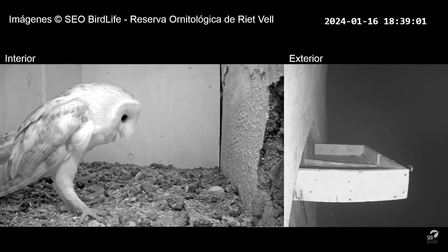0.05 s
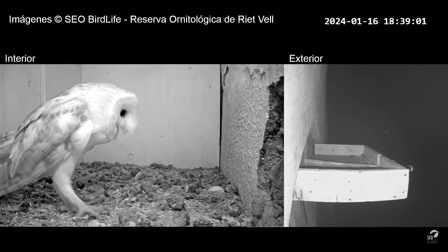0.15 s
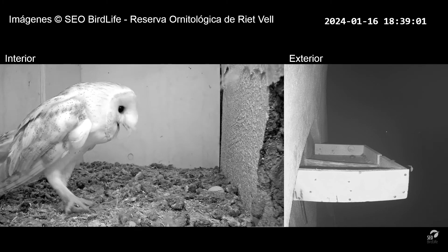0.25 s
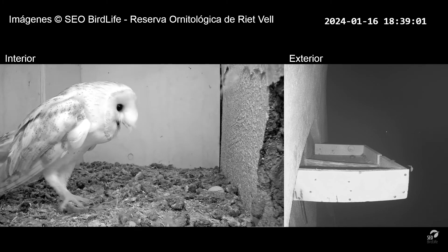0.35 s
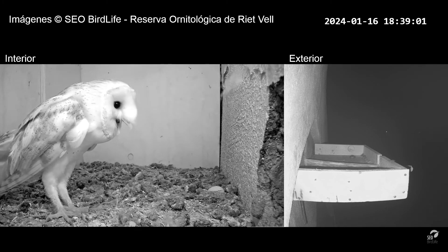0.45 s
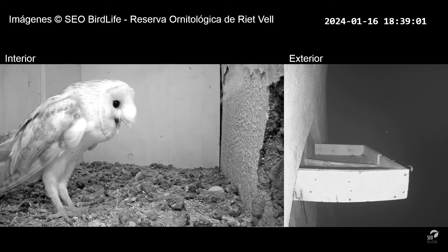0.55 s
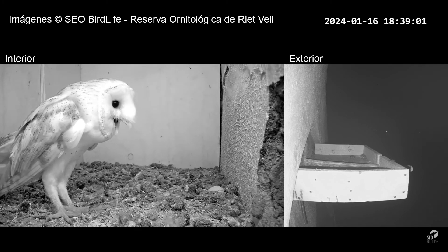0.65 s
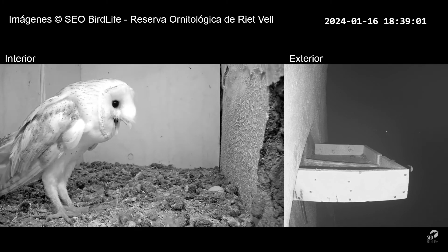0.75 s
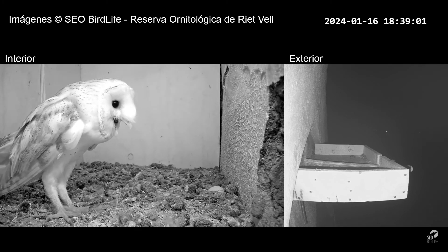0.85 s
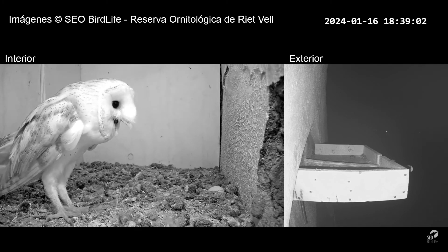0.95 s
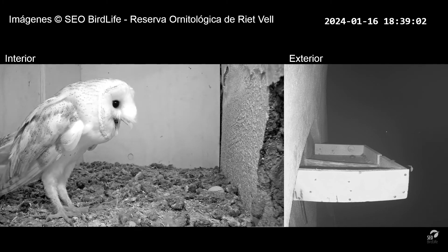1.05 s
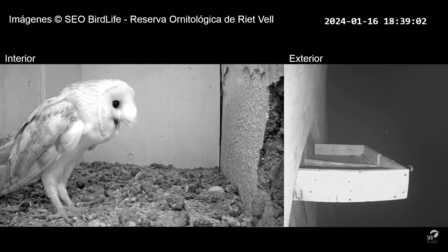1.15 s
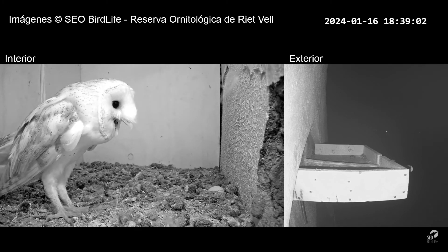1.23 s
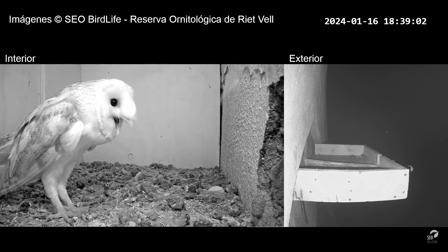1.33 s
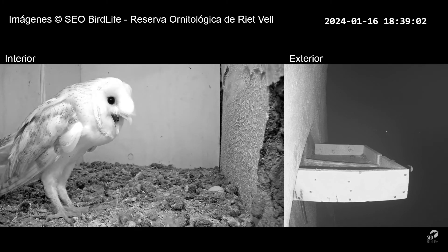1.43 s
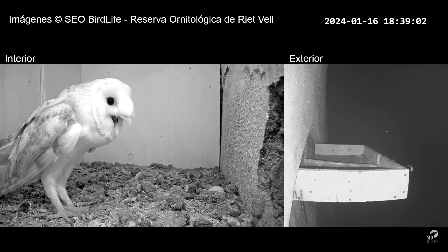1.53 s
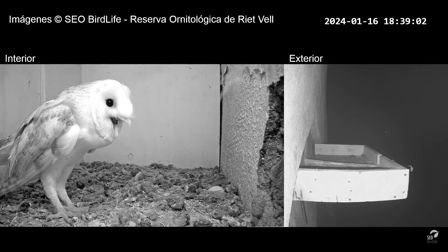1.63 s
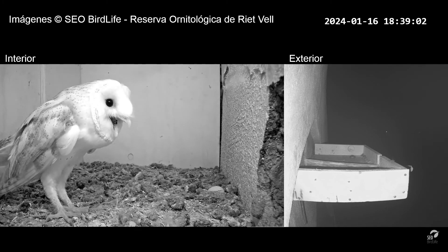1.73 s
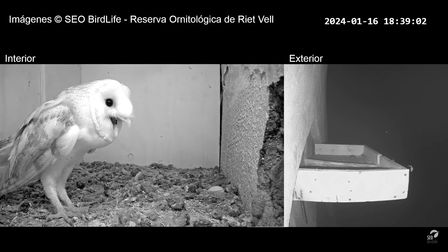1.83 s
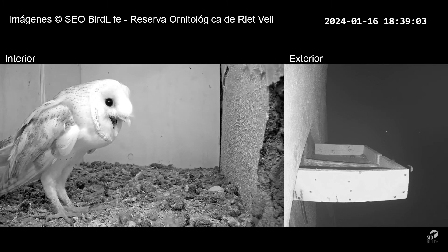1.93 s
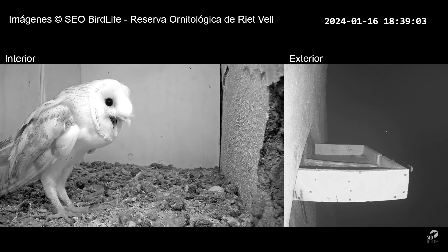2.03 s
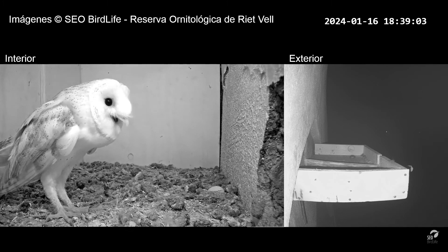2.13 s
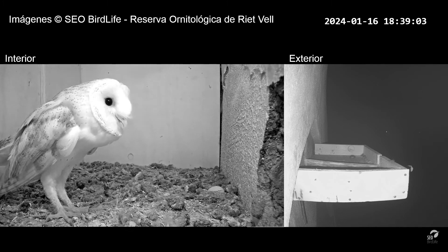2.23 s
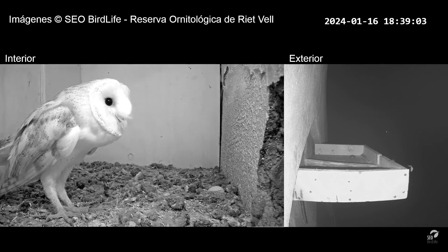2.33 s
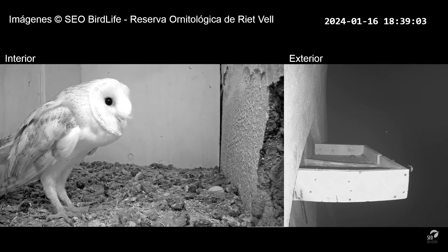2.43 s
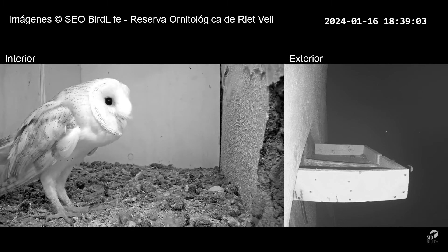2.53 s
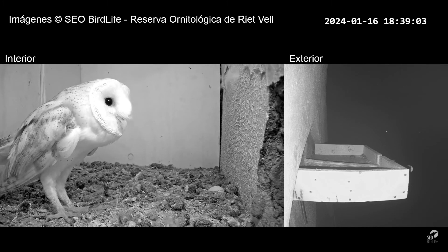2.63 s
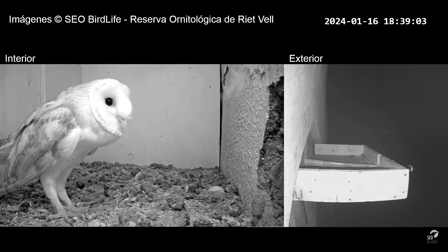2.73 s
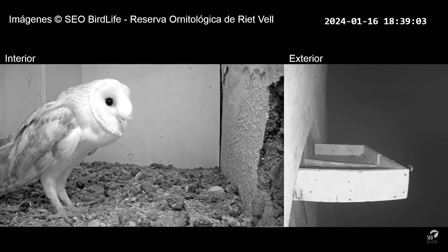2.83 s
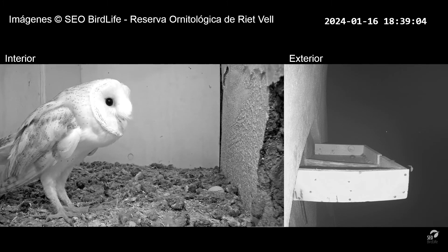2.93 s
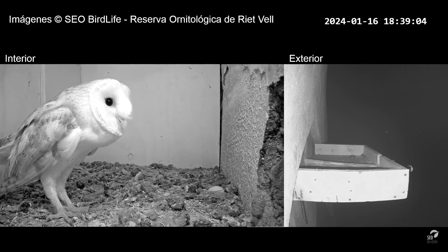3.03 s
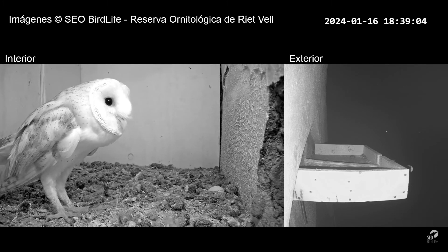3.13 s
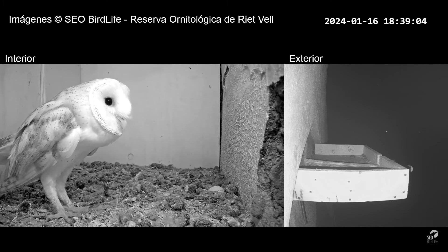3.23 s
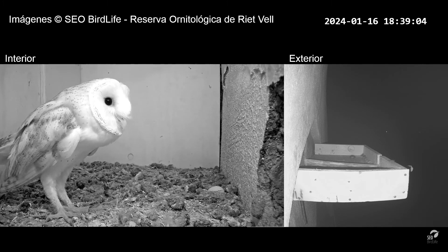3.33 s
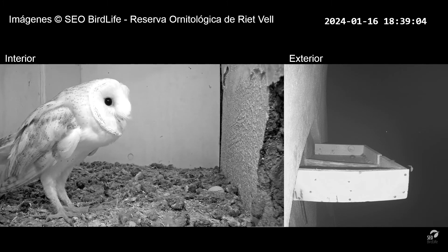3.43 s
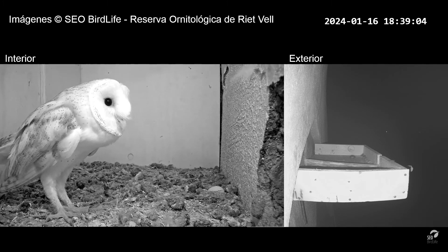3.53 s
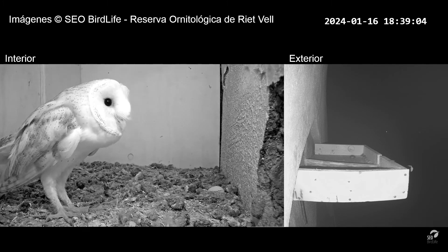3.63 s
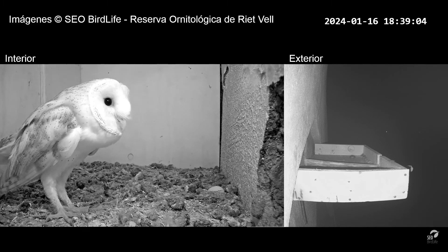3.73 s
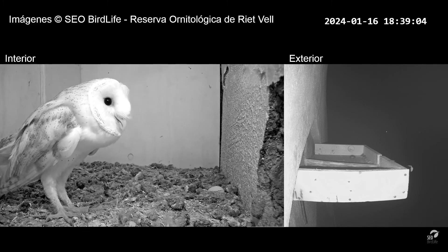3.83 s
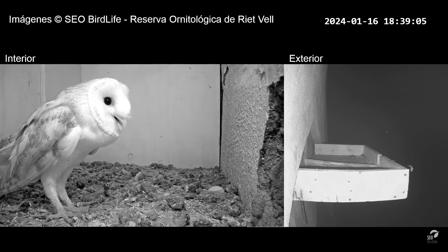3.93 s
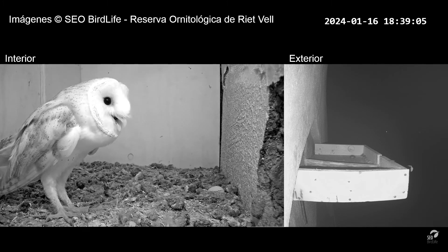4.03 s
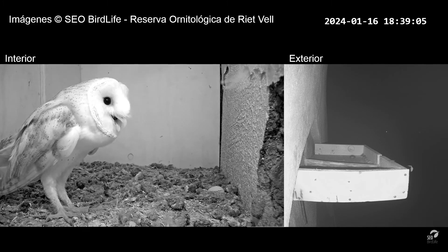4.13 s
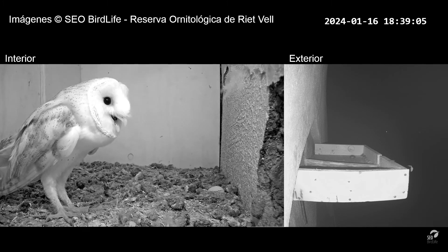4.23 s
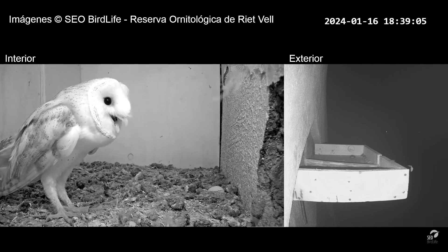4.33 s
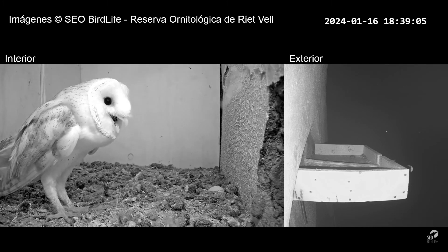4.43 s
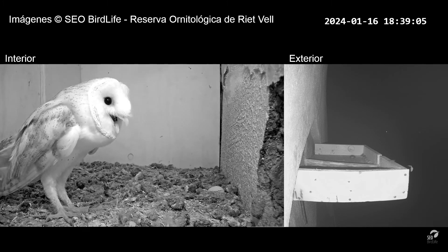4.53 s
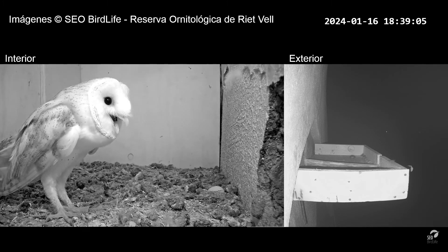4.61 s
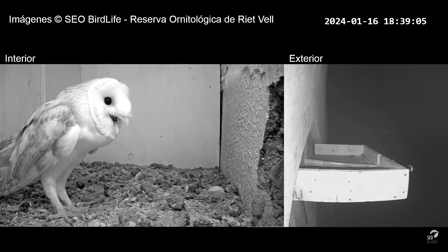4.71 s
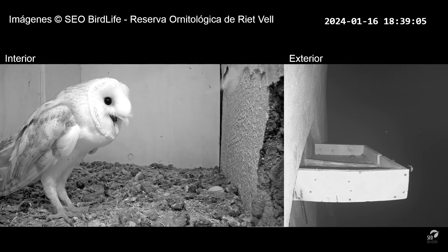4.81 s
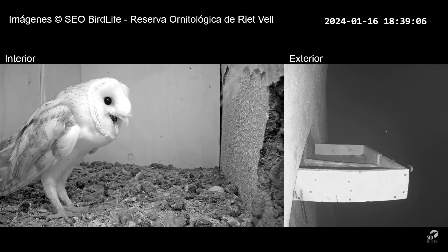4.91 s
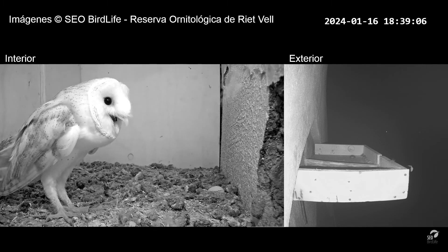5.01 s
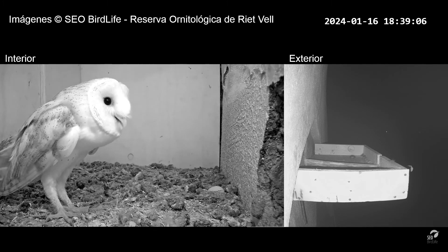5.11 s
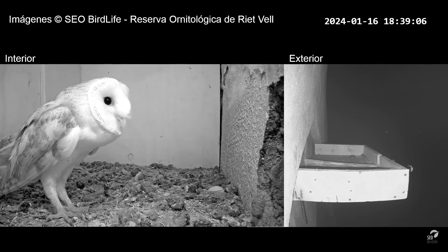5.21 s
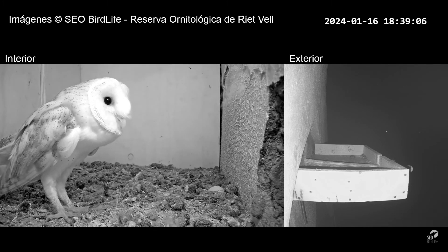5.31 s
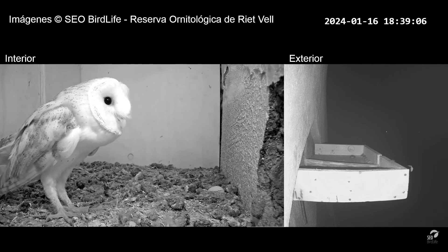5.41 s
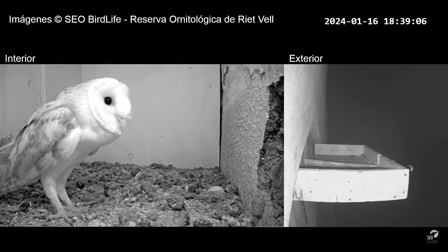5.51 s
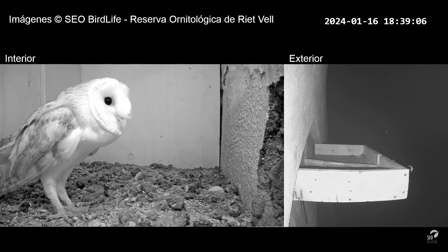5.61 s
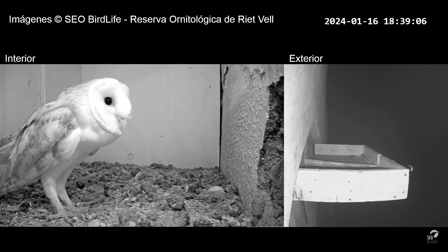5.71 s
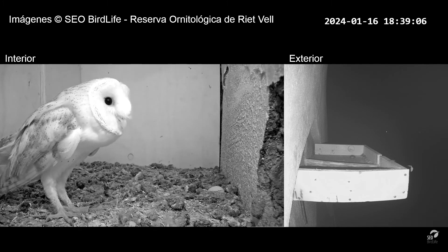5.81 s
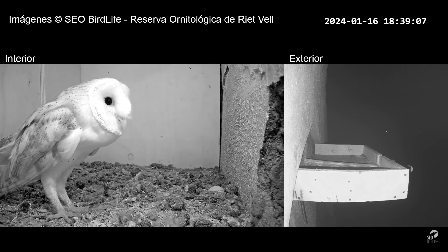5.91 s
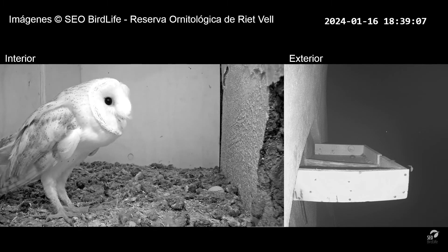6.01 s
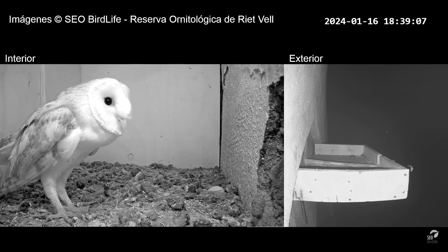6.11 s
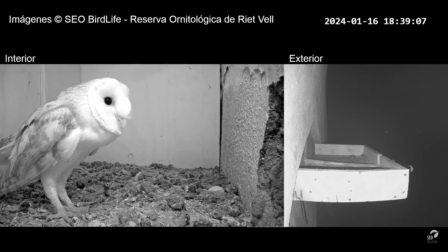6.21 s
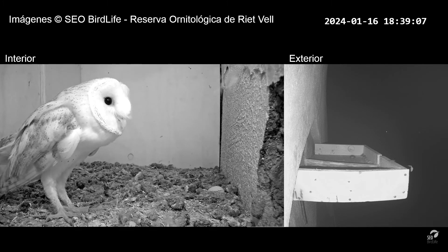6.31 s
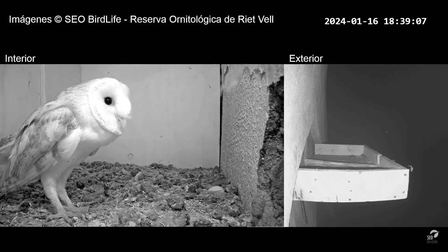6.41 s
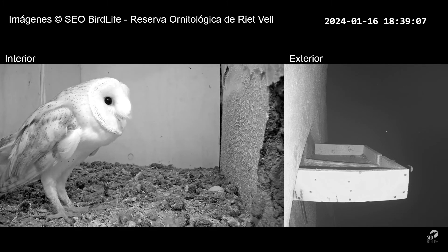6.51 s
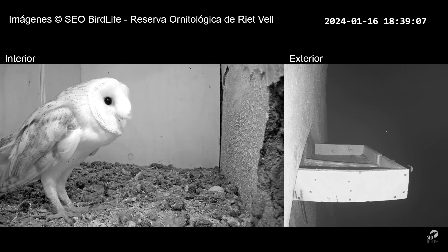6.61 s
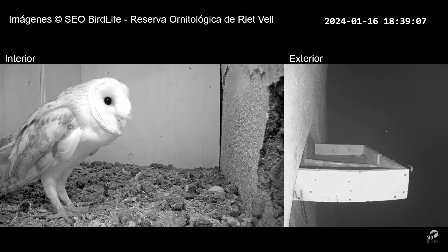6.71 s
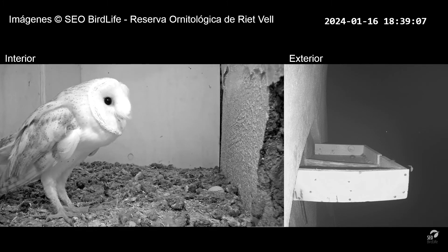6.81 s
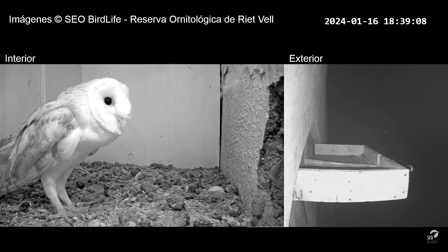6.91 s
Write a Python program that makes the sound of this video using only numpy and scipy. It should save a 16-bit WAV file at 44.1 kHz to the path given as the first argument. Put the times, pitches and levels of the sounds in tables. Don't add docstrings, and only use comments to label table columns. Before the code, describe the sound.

A barn owl screams twice inside a small wooden nest box, very close to a cheap camera microphone. The first rasping screech is already starting and lasts over two seconds, fluttering then swelling brighter. After a humming pause, a shorter second screech rises and snaps off in a loud, quick falling whistle. Faint hum and hiss remain, roughened by small digital dropouts.

```python
import sys
import numpy as np
from scipy import signal
from scipy.fft import rfft, irfft, next_fast_len
from scipy.io import wavfile
from scipy.ndimage import uniform_filter1d, map_coordinates

SR = 44100
rng = np.random.default_rng(int(sys.argv[2]) if len(sys.argv) > 2 else 0)


def waveform_to_disk(signal):
    frames = np.transpose(np.atleast_2d(signal))
    scaled = np.clip(frames, -1, 1) * 32767
    samples = np.round(scaled).astype(np.int16)
    wavfile.write(sys.argv[1], SR, samples)


def undo_db(level):
    steps = np.asarray(level, float) / 20
    return 10 ** steps


N = 306881
T = np.arange(N) / SR

# [start t/s, end t/s, full effort level/dB, swell time/s, most strained t/s]
SCREAMS = [
    (-.06, 2.41, -15, .26, 1.85),
    (3.87, 5.342, -16.5, .31, 5.15),
]
# [t/s, sag/dB, sag time/s]
CATCHES = [(.07, 6, 0.028), (.163, 9, .02), (.246, 6, .012), (.4, 6, .012), (.925, 3, .015),
           (1.297, 3, .012), (2.055, 3.5, .03), (3.998, 7, .04), (4.1, 4, .015), (4.438, 4, .03),
           (4.705, 4, 0.011)]
# [t/s, level/dB, decay/s]
TICK = (3.871, -37, .004)
# [lock t/s, drop/dB, release/s]
ENDINGS = [(2.357, 6, .035), (5.304, 11, .03)]
# [a puff opens t/s, puff rate f/Hz, first depth 0-1]
FLUTTER = [(.019, 52.8, .75), (3.999, 50.2, 1.1)]
# [opening t/s, shut hiss level/dB, shut top air level/dB, ripe jet level/dB,
# jet gain under strain/dB]
BEAK_MOVE = [(0.0, -41.5, -29.5, -12.5, 4), (3.8, -26.5, -40, -14, .5)]
# [starts to shrink t/s, length/mm, speed/(mm/s)]
CAVITY = [(.23, 16.3, 13.5), (4.03, 14.4, 4.6)]
# [f/Hz, density level/dB]
SHUT_THROAT = [(900, -45.5), (1100, -21.5), (1300, -9.5), (1600, 5.5), (1900, -5), (2150, -6), (2350, -23),
               (2700, -28), (3800, -23), (4600, -36.5), (5200, -59.5)]
THROAT = [(900, -65), (1150, -25.5), (1400, -15), (1600, -3), (2000, -4), (2250, 0.5), (2500, -13.5),
          (3000, -31), (4200, -28.5), (5000, -57.5)]
GAPE = [(2200, -28), (2450, -6), (2900, -8), (3200, 5.5), (3450, 0.5), (3600, -11.5), (3800, -8),
        (4200, -18.5), (5000, -24), (5500, -36)]
BEAK = [(4300, -20), (4800, -11), (5600, -5.5), (6250, 1.5), (6600, -6), (7100, -6.5), (7450, -19),
        (7800, -36)]
AIR = [(6500, -30.5), (7200, -10), (7600, -1), (8000, -2.5), (8200, -32)]
CHEST = [(200, -42.5), (280, -19.5), (345, 1), (420, -12.5), (485, 0), (575, -23), (670, 4.5), (730, -3.5),
         (790, -3.5), (880, -13.5), (1050, -7.5), (1400, -12.5)]
# [t/s, pitch f/Hz, level/dB]
WHISTLES = [
    [(2.36, 1500, -50), (2.375, 1380, -27), (2.388, 1277, -29), (2.4, 1245, -59)],
    [(3.891, 2041, -60), (3.896, 2060, -44.5), (3.91, 1990, -39.5), (3.92, 1930, -51)],
    [(5.298, 1758, -35), (5.308, 1754, -13), (5.32, 1695, -14.5), (5.332, 1454, -19.5), (5.345, 1250, -36),
     (5.355, 1200, -55)],
]
# [multiple of the pitch, level/dB]
OVERTONES = [(1, 0), (2, -4), (3, -28), (4, -29)]
# [f/Hz, width/Hz, gain/dB]
BOX_WAVES = [(1290, 120, 5), (1540, 90, -14), (1675, 25, -9), (1720, 45, 4.5), (1800, 35, -10),
             (1855, 35, 7), (2095, 45, -13), (2200, 80, 3), (2300, 50, -5), (2410, 70, -9), (2820, 60, -13),
             (2925, 90, 7), (3005, 60, -9), (3115, 50, 2), (3188, 50, -17), (3380, 35, -12), (3435, 50, 4),
             (3500, 80, -15), (2630, 60, 4), (3880, 70, -6), (4670, 90, 4), (6280, 200, 3)]
# [f/Hz, t60/s]
BOX_RING = [(500, .1), (1700, 0.075), (3300, 0.1), (8000, 0.097)]
YARD_RING = [(1200, .15), (1750, 0.55), (2400, .2), (8000, 0.13)]
# [t/s, f/Hz, peak level/dB]
CLAW_STEP = (.782, 68, -29.5)
# [multiple of 50 Hz, rms level/dB, phase/rad]
MAINS = [(1, -42, -0.26), (2, -56, -2.5), (3, -57, -1.5), (4, -68.5, -0.7), (5, -65, 6.5), (6, -70.5, -3),
         (7, -75.5, -1), (8, -81.5, -2), (9, -74, -1), (11, -70.5, -2), (13, -68.5, -4.5),
         (14, -78.5, -1.5), (15, -74, -2), (17, -76.5, 3), (19, -81.5, 3.5), (20, -82, -0.5)]
# [f/Hz, density level/dB]
HISS = [(15, -7), (40, -4), (130, -12.5), (300, -19.5), (600, -20.5), (1100, -24), (2000, -25.5),
        (4500, -28.5), (6000, -32), (7000, -38), (7600, -31.5), (8000, -31.5)]
# [t/s, lowest surviving f/Hz, highest surviving f/Hz, held tone f/Hz]
LOST = [(.06, 200, 2600, 7700), (.126, 200, 3000, 7700), (.241, 200, 4300, 7700), (.425, 1000, 5300, 400),
        (.96, 1050, 3700, 6300), (1.333, 1050, 3800, 6200), (3.005, 200, 1800, 4000),
        (3.979, 200, 2400, 7200), (4.165, 200, 3600, 5750), (4.376, 200, 3600, 6200),
        (4.793, 1050, 3600, 6200), (4.862, 1050, 3800, 5450), (4.955, 1050, 3800, 5350),
        (5.07, 1050, 3800, 4500), (5.605, 200, 2200, 4100), (6.302, 200, 900, 5000),
        (6.533, 200, 1200, 3100), (6.813, 200, 3100, 4900), (6.906, 200, 900, 4300)]

SWELL_DB, ATTACK_S, ATTACK_DB = 27, .045, 30.5
LOCK_S, RELEASE_DB, RELEASE_BEND = .012, 40, 1.5
STRAIN_S, STRAIN_DB = .35, 1.42
BURST_SHARE, BURST_S = .45, .05
BEAT_HZ, BEAT_HZ_PER_DB = 2009, 15
FLUTTER_FADE_S, TIRE_AFTER_S, TIRE_HZ_PER_S = .42, .7, 6.6
FLUTTER_LEFT = .11
OPEN_S, OPEN_BEND = .46, 1.6
GAPE_DB, GAPE_SHUT_DB = -5, -35.5
JET_RISE_DB, JET_S = 47, .47
AIR_DB, AIR_GROWS = -21.5, 1.3
LEAK_STEADY, LEAK_CLOSES = .4, .7
SOUND_M_PER_S, SMALLEST_MM = 343, 9
PAUSE_S = 3
WALLS_DB, YARD_DB, WHISTLE_YARD_DB = -11, -45.5, -31


def screech():
    age, sounding, strain, effort_db = effort()
    stream = syrinx(age, effort_db, scatter=.25, size_db=3, breath=.5)
    flow = stream(extra=0)
    jet = stream(extra=.2)

    parts, hiss_db, leak_db, ripe_db, strain_db = per_scream(BEAK_MOVE)
    beak_age = np.clip(T - parts, 0, None)
    opening = opened(age - ATTACK_S)
    gape = opened(beak_age)
    gape_db = GAPE_SHUT_DB + (GAPE_DB - GAPE_SHUT_DB) * gape
    jet_db = ripe_db + strain_db * strain - JET_RISE_DB * np.exp(-beak_age / JET_S)
    weak_db = LEAK_STEADY * np.clip(effort_db.max() - effort_db, 0, SWELL_DB) * (1 - gape)

    voice = (1 - opening) * coloured(flow, SHUT_THROAT) + opening * coloured(flow, THROAT)
    voice += undo_db(gape_db + .5 + 1.2 * wobble(13)) * coloured(flow, GAPE)
    edge = np.hypot(undo_db(jet_db), undo_db(hiss_db + weak_db))
    voice += edge * undo_db(1.0 + 1.3 * wobble(7.1)) * coloured(jet, BEAK)
    leak = (1 - gape) ** LEAK_CLOSES * undo_db(leak_db + weak_db)
    air = np.hypot(undo_db(AIR_DB + AIR_GROWS * jet_db), leak)
    voice += air * undo_db(3.5 + 2.1 * wobble(8)) * coloured(jet, AIR)

    chest_db = -40.5 + .27 * effort_db - 1.8 * np.clip(-51 - effort_db, 0, 30)
    voice = undo_db(effort_db) * voice + undo_db(chest_db) * coloured(flow, CHEST)

    shrinks, cavity_mm, speed = per_scream(CAVITY)
    length_mm = np.clip(cavity_mm - speed * (T - shrinks), SMALLEST_MM, cavity_mm)
    dip_hz = SOUND_M_PER_S / (4 * length_mm / 1000)
    return side_cavity(sounding * voice, dip_hz, width_hz=300, depth_db=-18.5, above_db=-1.5)


def effort():
    start, end, full_db, swell_s, peak_s = per_scream(SCREAMS)
    lock, drop_db, release_s = per_scream(ENDINGS)
    age = np.clip(T - start, 0, None)
    strain = np.exp(-((T - peak_s) / STRAIN_S) ** 2)
    db = full_db + STRAIN_DB * strain - SWELL_DB * np.exp(-age / swell_s)
    db -= ATTACK_DB * np.clip(1 - age / ATTACK_S, 0, 1)
    db -= drop_db * np.clip((T - lock) / LOCK_S, 0, 1)
    db -= RELEASE_DB * np.clip(1 - (end - T) / release_s, 0, 1) ** RELEASE_BEND
    for s, sag_db, sag_s in CATCHES:
        away = np.abs(T - s)
        db += sag_db * np.where(T < s, -np.exp(-away / sag_s), BURST_SHARE * np.exp(-away / BURST_S))
    s, tick_db, decay_s = TICK
    tick = (T > s) * undo_db(tick_db) * np.exp(-np.abs(T - s) / decay_s)
    db = 20 * np.log10(undo_db(db) + tick)
    return age, (T > start) & (T < end), strain, uniform_filter1d(db, size=150)


def syrinx(age, effort_db, scatter, size_db, breath):
    weaker_db = np.clip(effort_db - effort_db.max(), -SWELL_DB, 0)
    beat_hz = BEAT_HZ + BEAT_HZ_PER_DB * weaker_db
    cycle = np.cumsum(beat_hz * (1 + .05 * wobble(60))) / SR
    chance = rng.standard_normal((16000, 2))
    beat_cycle = np.cumsum(np.clip(1 + scatter * chance[:, 0], .3, 3))
    at = np.interp(beat_cycle, cycle, np.arange(N)).astype(int)
    beats = np.bincount(at, undo_db(size_db * chance[:, 1]), N)
    beats[-1] = 0
    beats = unit(beats - uniform_filter1d(beats, size=400))
    flow = unit(beats + breath * rng.standard_normal(N))

    _, flutter_hz, depth = per_scream(FLUTTER)
    flutter_hz = flutter_hz - TIRE_HZ_PER_S * np.clip(age - TIRE_AFTER_S, 0, 2)
    turns = np.cumsum(flutter_hz * (1 + .034 * wobble(25))) / SR
    first_turn = per_scream(np.interp(np.transpose(FLUTTER)[0], T, turns))
    turn = (turns - first_turn) % 1
    puff = np.exp(-2.2 * turn) * (1 - np.exp(-15 * turn))
    depth = FLUTTER_LEFT + depth * np.exp(-age / FLUTTER_FADE_S)
    depth = depth * undo_db(2.5 * wobble(30))

    def stream(extra):
        d = np.clip(depth + extra, 0, .95)
        return flow * (1 - d + d * puff / puff.mean()) / np.sqrt(1 + .14 * d ** 2)

    return stream


def opened(age):
    return 1 - np.exp(-(np.clip(age, 0, None) / OPEN_S) ** OPEN_BEND)


def side_cavity(x, dip_hz, width_hz, depth_db, above_db):
    hz, t, z = signal.stft(x, SR, nperseg=512)
    off = (hz[:, None] - np.interp(t, T, dip_hz)) / width_hz
    gain_db = depth_db * np.exp(-off ** 2) + above_db * (off > 0)
    return signal.istft(z * undo_db(gain_db), SR, nperseg=512)[1][:N]


def whistle():
    out = np.zeros(N)
    for rows in WHISTLES:
        pitch_hz, level_db = curves(rows)
        phase = 2 * np.pi * np.cumsum(pitch_hz) / SR
        tone = 0
        for k, db in OVERTONES:
            softer_db = .7 * (k - 1) * (level_db + 20)
            tone = tone + undo_db(db + softer_db) * np.sin(k * phase)
        sounding = (T > rows[0][0]) & (T < rows[-1][0])
        out += sounding * undo_db(level_db - 1.5) * tone
    return out


def box(x):
    def wave(f, centre, width, gain):
        off = centre ** 2 - f ** 2
        loss = 1j * f * width
        return (off + loss * max(gain, 1) * min(gain, 1)) / (off + loss)

    x = filtered(x, lambda f: np.prod([wave(f, hz, w, undo_db(db)) for hz, w, db in BOX_WAVES], axis=0))
    late = np.pad(x, (1300, 0))
    return x + undo_db(WALLS_DB) * tail(x, BOX_RING) + undo_db(YARD_DB) * tail(late, YARD_RING)


def step():
    s, hz, db = CLAW_STEP
    return undo_db(db) * np.cos(2 * np.pi * hz * (T - s) - .6) * np.exp(-((T - s) / .01) ** 2)


def electronics():
    phase = 2 * np.pi * 50.006 * (T - 3)
    hum = 0
    for k, db, rad in MAINS:
        hum = hum + undo_db(db + 3.0 + .04 * k * wobble(5.3)) * np.cos(k * phase + rad)
    return hum + undo_db(-56) * coloured(rng.standard_normal(N), HISS)


def per_scream(rows):
    return np.array(rows)[(T > PAUSE_S).astype(int)].T


def curves(rows):
    s, *cols = np.transpose(rows)
    return [np.interp(T, s, c) for c in cols]


def wobble(rate):
    return map_coordinates(rng.standard_normal(int(N * rate / SR) + 4), [T * rate])


def unit(x):
    return x / np.sqrt(np.mean(x ** 2) + 1e-20)


def along(points, hz):
    f, v = np.transpose(points)
    return np.interp(np.log(hz + 1), np.log(f + 1), v)


def filtered(x, response):
    m = next_fast_len(N + SR // 2)
    return irfft(rfft(x, m) * response(np.fft.rfftfreq(m, 1 / SR)), m)[:N]


def coloured(x, spectrum):
    closed = [(spectrum[0][0] * .8, -120), *spectrum, (spectrum[-1][0] * 1.2, -120)]
    return unit(filtered(x, lambda hz: undo_db(along(closed, hz))))


def tail(x, t60s):
    hz, t, z = signal.stft(rng.standard_normal(SR // 2), SR, nperseg=128)
    decay = undo_db(-60 * t / along(t60s, hz)[:, None])
    h = signal.istft(z * decay, SR, nperseg=128)[1]
    return signal.fftconvolve(x, h / np.linalg.norm(h))[:N]


def scene():
    tone = whistle()
    owl = box(screech() + tone) + undo_db(WHISTLE_YARD_DB) * tail(tone, YARD_RING)
    return (owl + step() + electronics())[None]


def starve(x, under_db):
    hz, t, z = signal.stft(x, SR, nperseg=1024)
    power = uniform_filter1d(np.abs(z) ** 2, size=4, axis=1)
    moody_db = 3.5 * np.interp(t, T, wobble(9))
    for lo, hi in ((7100, 7600), (7600, 8100)):
        band = (hz >= lo) & (hz < hi)
        floor = power[hz > 300].sum(axis=0) * undo_db(2 * (under_db + moody_db))
        z[band] *= power[band].mean(axis=0) > floor
    return signal.istft(z, SR, nperseg=1024)[1][:N]


def lose(x, tone_share):
    out, size = x.copy(), 1764
    hz = np.fft.rfftfreq(size, 1 / SR)
    fade = np.hanning(size) ** .8
    for s, lo, hi, tone_hz in LOST:
        centre = round(s * SR)
        at = slice(centre - size // 2, centre + size // 2)
        z = rfft(x[at] * np.hanning(size))
        held = (rng.random(len(hz)) < tone_share) | (np.abs(hz - tone_hz) < 30)
        gone = (hz > 200) & ((hz < lo) | (hz > hi))
        out[at] += fade * (4.4 * irfft(z * (gone & held)) - .83 * irfft(rfft(x[at]) * gone))
    return out


def low_pass(x):
    return signal.sosfilt(signal.butter(12, 9070, fs=SR, output="sos"), x)


def record(dry):
    x = dry[0] / (1 + np.abs(dry[0] / .5) ** 6) ** (1 / 6)
    edge = [(7200, -.5), (7600, -10), (8000, -14.0)]
    x = filtered(x, lambda hz: (hz < 8000) * undo_db(along(edge, hz)))
    x = starve(x, under_db=-57)
    x = lose(x, tone_share=.0065)
    mirror = 2 * x * np.cos(2 * np.pi * 16000 * T)
    leak = [(8000, -1), (8400, -11.5), (8800, -27), (9100, -37), (9400, -70), (10000, -120)]
    x = x + filtered(mirror, lambda hz: (hz > 8000) * undo_db(along(leak, hz)))
    return low_pass(x[None])


dry = scene()
out = record(dry)
waveform_to_disk(out)
```